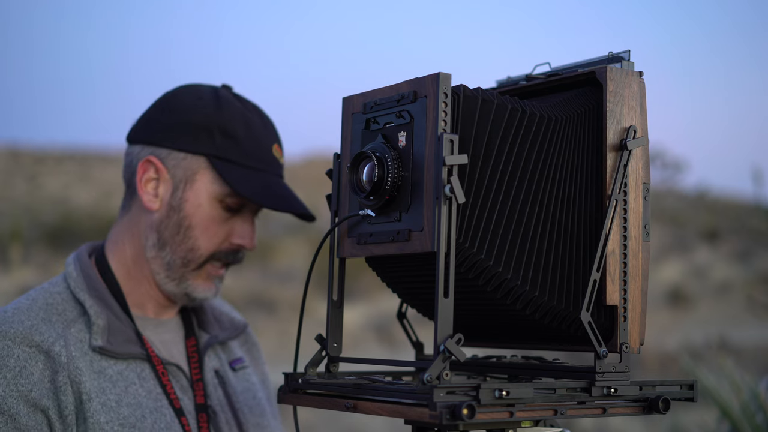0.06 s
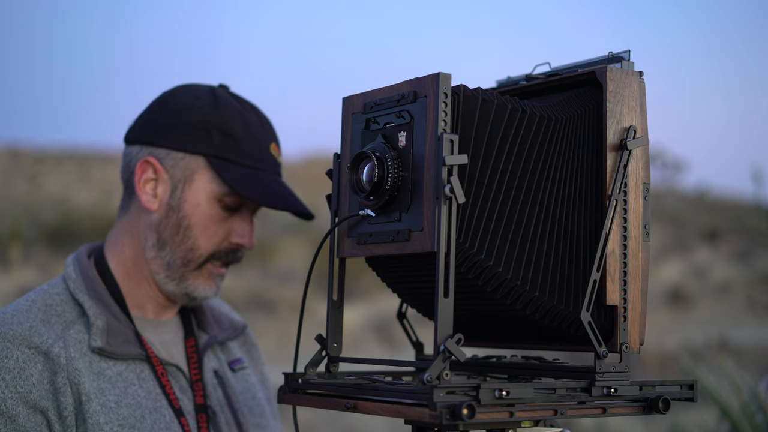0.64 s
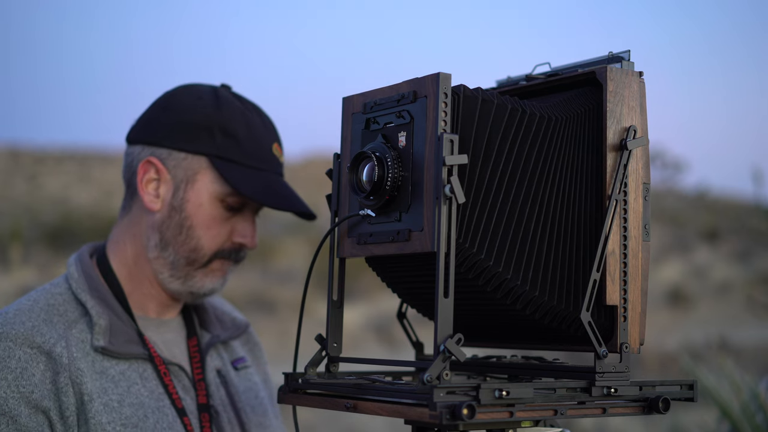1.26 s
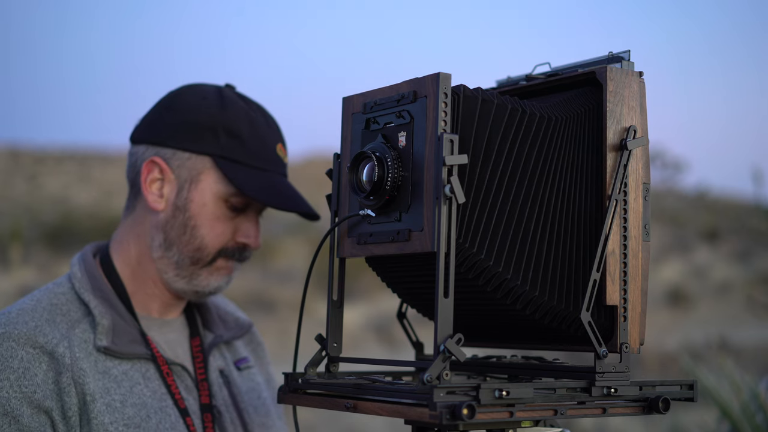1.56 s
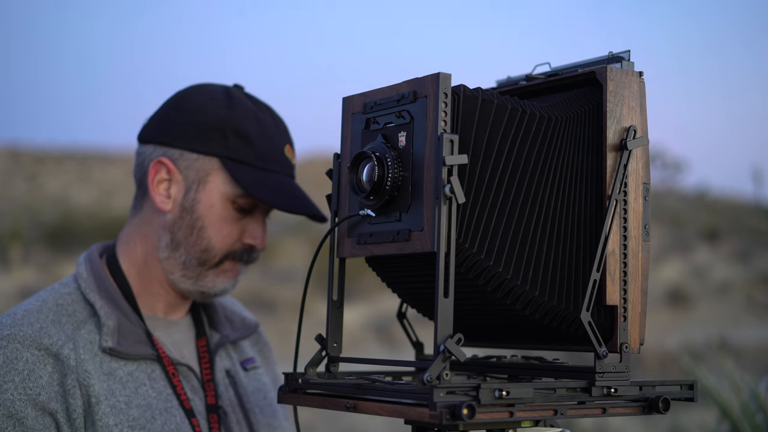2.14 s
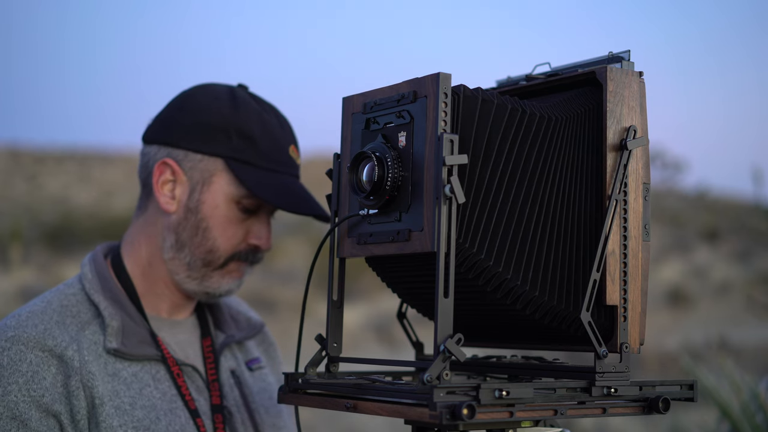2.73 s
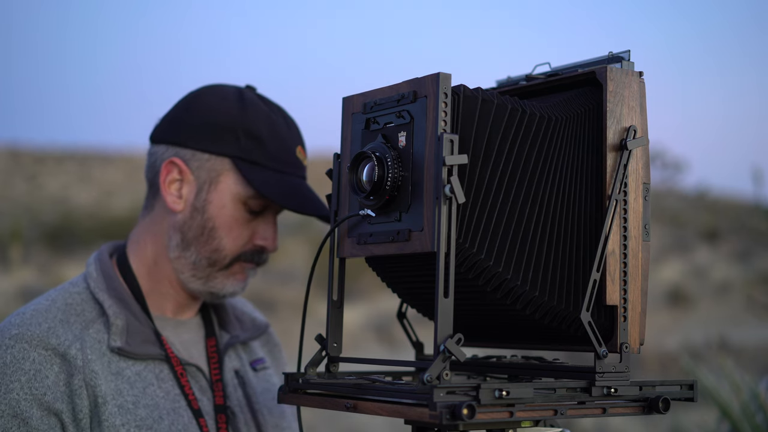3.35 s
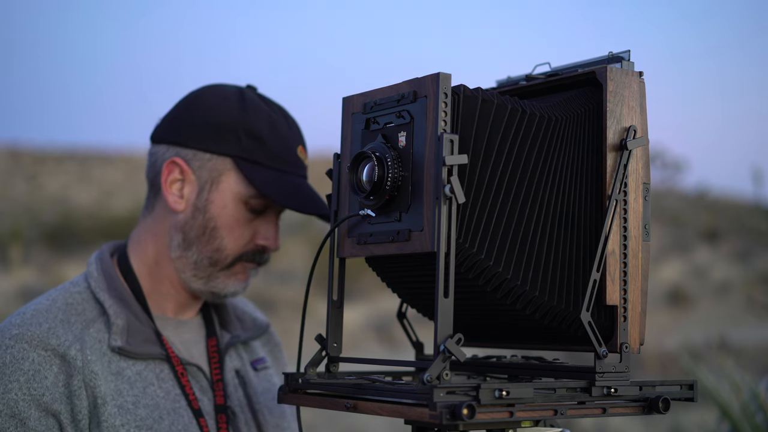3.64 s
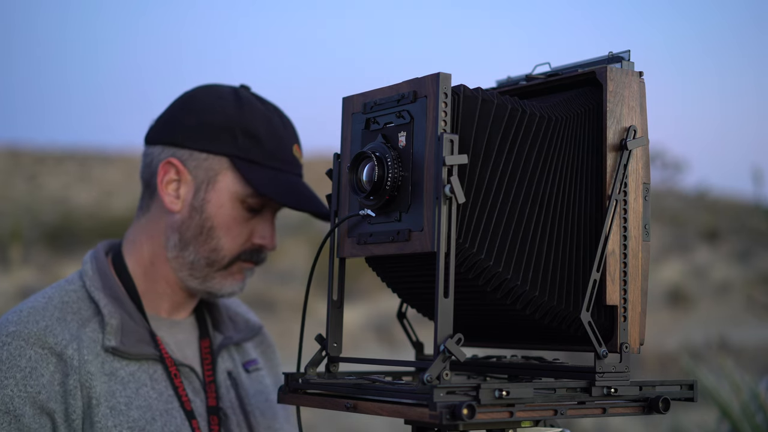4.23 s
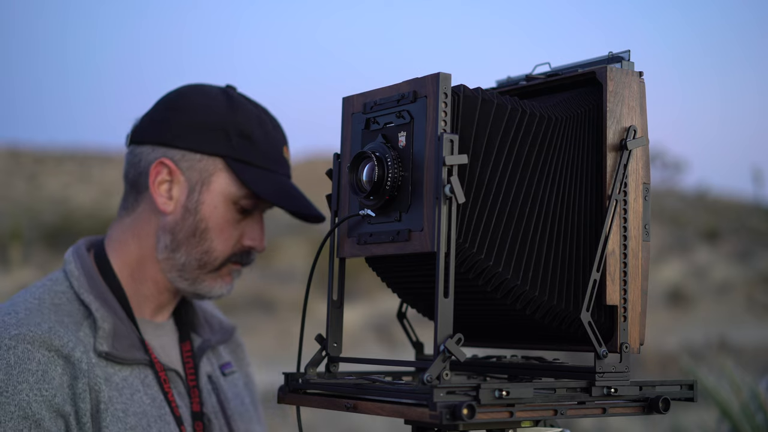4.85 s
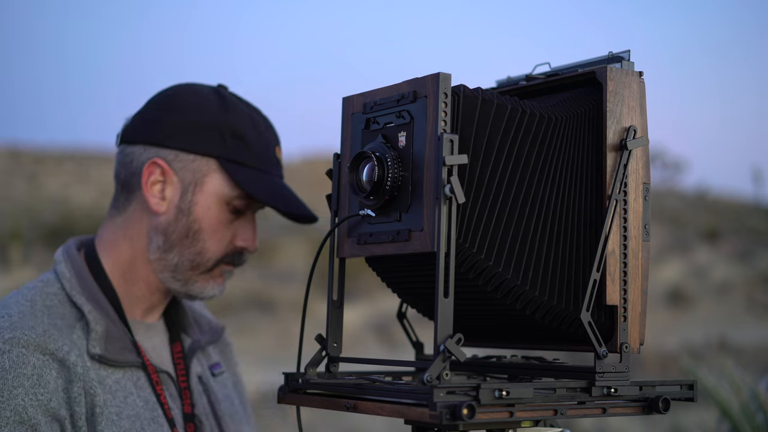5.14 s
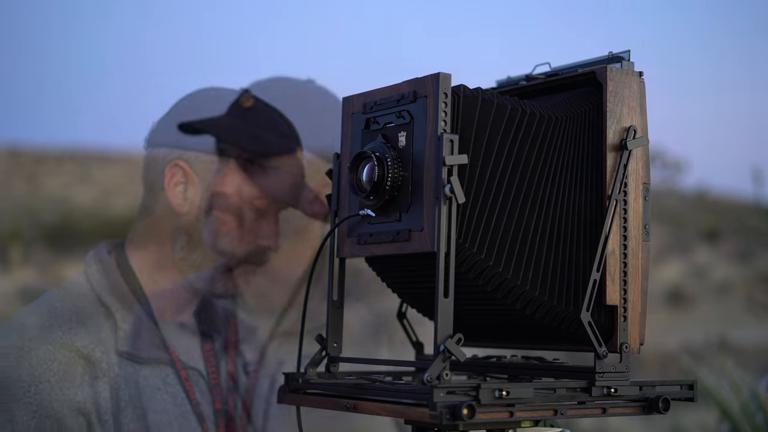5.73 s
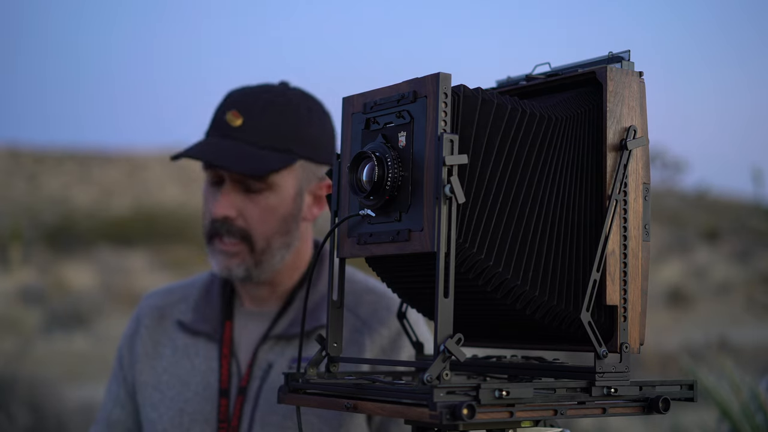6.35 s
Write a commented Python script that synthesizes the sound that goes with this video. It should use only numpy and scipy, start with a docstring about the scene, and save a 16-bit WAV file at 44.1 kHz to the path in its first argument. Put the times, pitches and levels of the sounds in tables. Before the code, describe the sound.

Quiet wind and far road noise, broken by a camera shutter's sharp click and softer closing tick; later, fleece rustles faintly.

```python
"""Leaf shutter in the desert

On a quiet evening the air rumbles softly and tyres murmur on a far road. A cable release trips the
clockwork shutter of a wooden view camera: the blades snap open, ringing the housing and lens board,
and a moment later the gears whirr and tick them shut. The plunger springs back, a far engine pulls
away, and a fleece jacket rustles as the photographer turns."""
import sys
import numpy as np
from scipy import signal
from scipy.fft import rfft, irfft, next_fast_len
from scipy.io import wavfile

SR = 44100
rng = np.random.default_rng(int(sys.argv[2]) if len(sys.argv) > 2 else 0)


def pcm_store(signal):
    """Save signal as 16-bit PCM."""
    levels = np.round(np.clip(np.atleast_2d(signal), -1, 1) * 32767)
    wavfile.write(sys.argv[1], SR, levels.astype(np.int16).T)


N = 281534
TIME = np.arange(N) / SR


def from_db(db):
    """Decibels to gain."""
    return 10 ** (np.asarray(db) / 20)


def rms_one(x):
    """Scale to unit power."""
    return x / np.sqrt(np.mean(x ** 2) + 1e-20)


def at_hz(points, hz):
    """Read a curve on a log-frequency axis."""
    f, value = np.transpose(points)
    return np.interp(np.log(np.maximum(hz, 1)), np.log(f), value)


def pan(left_db):
    """Stereo gains that put the left side left_db above the right."""
    return from_db(np.array([[left_db], [-left_db]]) / 2)


def drift(per_s):
    """A smooth random wander of unit power."""
    knots = rng.standard_normal(1024)
    return rms_one(np.interp(TIME * per_s, np.arange(len(knots)), knots))


def stroke(start, end, db, attack, release):
    """Envelope that rises, holds and dies away; release is a t60."""
    rise = np.clip((TIME - start) / max(attack, 1 / SR), 0, 1)
    return rise * from_db(db) * np.exp(-np.log(1000) * np.clip((TIME - end) / release, 0, 10))


def swell(peak_s, db, half_width):
    """Envelope of something that draws near and recedes."""
    return from_db(db) / (1 + ((TIME - peak_s) / half_width) ** 2)


def together(gains):
    """Unrelated noises add in power."""
    return np.sqrt(sum(gain ** 2 for gain in gains))


def colour(x, spectrum, size=2048):
    """Minimum-phase EQ that keeps the power of white noise."""
    log_gain = np.log(rms_one(from_db(at_hz(spectrum, np.arange(size // 2 + 1) * SR / size))))
    cepstrum = irfft(log_gain)
    cepstrum[1:size // 2] *= 2
    cepstrum[size // 2 + 1:] = 0
    return signal.fftconvolve(x, irfft(np.exp(rfft(cepstrum))))[:N]


def wide_noise(spectrum, likeness):
    """Unit-power stereo noise of a given colour and left-right likeness."""
    size = next_fast_len(N, True)
    hz = np.arange(size // 2 + 1) * SR / size
    mid, side = rfft(rng.standard_normal((2, size))) * from_db(at_hz(spectrum, hz))
    alike = np.clip(at_hz(likeness, hz), 0, 1)
    left_right = np.sqrt(1 + alike) * mid + np.sqrt(1 - alike) * side * [[1], [-1]]
    return rms_one(irfft(left_right, size)[:, :N])


def resonate(x, hz, width_hz):
    """One resonance with unity gain at its peak."""
    r = np.exp(-np.pi * width_hz / SR)
    feedback = [1, -2 * r * np.cos(2 * np.pi * hz / SR), r * r]
    return signal.lfilter(np.array([1, 0, -1]) * (1 - r * r) / 2, feedback, x + 1e-18)


def ring(force, modes):
    """A body's modes answer the force that drives them."""
    return sum(from_db(db) * resonate(force, hz, np.log(1000) / (np.pi * t60)) for hz, db, t60 in modes)


def far_tone(hz, flutter_per_s):
    """A tone whose strength and phase waver on the way through the air."""
    phase = 2 * np.pi * np.cumsum(np.full(N, hz)) / SR
    return rms_one(drift(flutter_per_s) * np.cos(phase) + drift(flutter_per_s) * np.sin(phase))


def knocks(rows, broad, size=8192):
    """Each hit is a short crack, brightest at its own pitch; broad mixes in unfiltered grit."""
    out, t = np.zeros(N + size), np.arange(size) / SR
    for (s, db, hz, t60), grit in zip(rows, rng.standard_normal((len(rows), size))):
        decay = from_db(-60 * t / t60)
        burst = np.sign(grit) * decay
        crack = broad * burst + resonate(burst, hz, hz / 2)
        at = round(s * SR)
        out[at:at + size] += from_db(db) * crack * np.linalg.norm(decay) / np.linalg.norm(crack)
    return out[:N]


def sliding(rows, teeth_per_s, tooth_depth_db):
    """Metal rubs on metal in fine grit that pulses as each tooth or burr slips past."""
    tooth_phase = np.cumsum(teeth_per_s * (1 + 0.54 * drift(100))) / SR % 1
    grit = rms_one(rng.standard_normal(N) * from_db(-tooth_depth_db * tooth_phase))
    return together(stroke(*row) for row in rows) * grit


# Soft gusts. Each row: peak in seconds, level in dB, half-width in seconds.
GUSTS = [(.06, -43, .17), (1.55, -46, .1), (1.91, -41, .13), (2.28, -43.5, .1), (3.1, -50.5, .2),
         (4.78, -48, .2), (6.22, -51.5, .12)]
# The air's low-end weight. Each row: frequency in Hz, gain in dB.
RUMBLE_EQ = [(12, -36.5), (20, -13), (48, -2), (65, -1.5), (107, -1.5), (150, -7.5), (189, -6.5),
             (300, -19.5), (390, -45.5), (660, -120)]
# Stereo image of the distance. Each row: frequency in Hz, left-right likeness from 0 to 1.
FAR_LIKENESS = [(25, .45), (60, 0.9), (125, .85), (250, .92), (500, 0.95), (1200, 1)]


def air_rumble():
    """Nearly calm air rumbles and lifts with each gust."""
    calm = from_db(-50.5)
    wind = together([calm] + [swell(*gust) for gust in GUSTS])
    return wind * from_db(0.65 * drift(14)) * wide_noise(RUMBLE_EQ, FAR_LIKENESS) * pan(-.7)


# The thin top of the noise floor. Each row: frequency in Hz, gain in dB.
HISS_EQ = [(1180, -35.5), (2000, 2), (2110, -0.5), (3390, -0.5), (13400, -3.5), (15100, -7.5),
           (15800, -4.5)]
# Its stereo image. Each row: frequency in Hz, left-right likeness from 0 to 1.
HISS_LIKENESS = [(2000, 0.59), (10000, 0.7), (15000, 0.5)]


def microphone_hiss():
    """A faint, steady bed of microphone noise."""
    return from_db(-64.76) * wide_noise(HISS_EQ, HISS_LIKENESS) * pan(.6)


def far_hum():
    """Something hums low in the distance."""
    return from_db(-55.5) * far_tone(62, flutter_per_s=11) * pan(-2)


# Far pass-bys. Each row: nearest moment in seconds, level in dB, half-width in seconds, tyre pitch in Hz.
PASSES = [(.2, -55.5, 0.49, 756.3), (2.2, -56, 0.29, 770.4), (3.75, -54, 0.69, 734.3),
          (5.33, -54, .16, 462.3)]
# The tyres' broad tones. Each row: ratio to the tyre pitch, level against the pass in dB.
TYRE_TONES = [(.6, -7.5), (.8, -1), (1, 2), (1.22, -8)]


def tyres():
    """Tyres sing in a fluttering cluster of tones as each vehicle passes."""
    song = sum(swell(s, db + tone_db, width) * far_tone(ratio * hz, flutter_per_s=90)
               for s, db, width, hz in PASSES for ratio, tone_db in TYRE_TONES)
    return song * pan(-2)


# The dull colour of far traffic. Each row: frequency in Hz, gain in dB.
ROAD_EQ = [(120, -5.5), (220, -1), (370, -2.5), (450, 1), (550, -2.5), (650, 1), (800, -2), (950, -5.5),
           (1300, -11), (1600, -19), (2100, -27.5), (4000, -42)]


def road_wash():
    """The far road's steady wash swells with each pass and with the engine pulling away."""
    steady = from_db(-49.5)
    with_engine = from_db(-51.5) * engine_effort()
    passes = [swell(s, db + 1.5, width) for s, db, width, _ in PASSES]
    return together([steady, with_engine] + passes) * wide_noise(ROAD_EQ, FAR_LIKENESS) * pan(-2)


# The lever slides, the blades sweep open, then shiver to rest.
# Each row: start and end in seconds, level in dB, attack and release t60 in seconds.
SLIDES = [(2.788, 2.820, -32.5, 0.025, 0.014), (2.8335, 2.849, -20.5, 0.0017, .018),
          (2.851, 2.854, -33.5, .002, .105)]
# Metal hits, from the lever's first tick to the blades closing.
# Each row: start in seconds, level in dB, brightest frequency in Hz, t60 in seconds.
CONTACTS = [(2.812, -32, 8000, 0.0071), (2.8207, -19, 6860, 0.0033), (2.8325, -6, 11500, 0.0079),
            (2.8383, -5.5, 8356, .007), (2.8588, -15.5, 9300, 0.0051), (2.879, -31.5, 4400, 0.014),
            (2.9685, -44, 9500, .006), (2.9754, -37, 7580, .011), (2.9875, -32, 13000, .006),
            (2.9953, -28.5, 7500, .004), (3.0255, -42, 1500, 0.02)]
# The shutter's bright snap. Each row: frequency in Hz, gain in dB.
SHUTTER_EQ = [(200, -46), (380, -8.5), (800, -9.5), (1300, -1.5), (1850, -12), (2400, -3), (3100, -9.5),
              (4300, 1), (5700, -0.5), (7000, -9.5), (8600, 3), (11000, -3.5), (13500, -1.5),
              (15500, -12.5)]


def blades():
    """Lever and blades slide and crack; a duller knock of the casing trails each contact."""
    lag_s, casing_db, casing_hz, casing_t60_s = .0014, -15.5, 2420, .012
    casing = [(s + lag_s, db + casing_db, casing_hz, casing_t60_s) for s, db, _, _ in CONTACTS]
    cracks = knocks(CONTACTS + casing, broad=.35)
    scrape = sliding(SLIDES, teeth_per_s=340, tooth_depth_db=5.5)
    return colour(cracks + scrape, SHUTTER_EQ)


# The wooden lens board rings low, the shutter housing above it.
# Each row: frequency in Hz, relative level in dB, t60 in seconds.
HOUSING_MODES = [(376, -34.5, 0.07), (467, -34.5, 0.31), (1236, -30.5, .045), (1600, -32.5, 0.09),
                 (2350, -29.5, 0.02), (3570, -29.5, .07), (4520, -25.5, .07), (4400, -27, .05),
                 (5300, -29.5, 0.026), (5650, -32, 0.06), (6145, -34.5, .07), (7584, -30, 0.057),
                 (8500, -32.5, .04), (8160, -28.5, 0.033), (8625, -32, .05), (8805, -33.5, .07),
                 (10200, -27, .06), (9458, -26.5, .05), (10020, -33, .05), (9800, -31.5, 0.057),
                 (11400, -35.5, 0.049), (11895, -30.5, .06), (11930, -32.5, .05), (13660, -40.5, .05)]


def housing():
    """Every contact jolts the housing and its board, and each mode rings on briefly."""
    jolts, t = np.zeros(N), np.arange(8192) / SR
    for s, db, _, _ in CONTACTS:
        jolts[round(s * SR)] += from_db(db)
    # alternating polarity keeps the modes from piling into one spike
    ringing = sum((-1) ** k * from_db(db - 60 * t / t60) * np.sin(2 * np.pi * hz * t)
                  for k, (hz, db, t60) in enumerate(HOUSING_MODES))
    return from_db(-3) * signal.fftconvolve(jolts, ringing)[:N]


# Dull plunger taps. Each row: start in seconds, level in dB, brightest frequency in Hz, t60 in seconds.
TAPS = [(2.9412, -54, 3200, 0.019), (3.5098, -46.5, 4030, 0.046)]
# Their mid-heavy colour. Each row: frequency in Hz, gain in dB.
PLUNGER_EQ = [(500, -22), (1300, 4), (2000, -0.5), (2800, -4), (4200, -9), (5500, -12), (8300, -6),
              (10000, -20), (15000, -28)]
# The plunger's short ring. Each row: frequency in Hz, gain in dB, t60 in seconds.
PLUNGER_MODES = [(1406, 5, .03), (1590, 7, 0.031), (2030, 16, 0.047), (3160, 6, 0.019), (4250, 0, 0.024)]


def plunger():
    """The cable release bottoms out, then springs back."""
    taps = colour(knocks(TAPS, broad=0.7), PLUNGER_EQ)
    return taps + ring(taps, PLUNGER_MODES)


# One quick whirr. Each row: start and end in seconds, relative level in dB,
# attack and release t60 in seconds.
GEAR_RUN = [(2.970, 3.0255, -41, 0.0041, 0.0075)]
# The gears' wiry colour. Each row: frequency in Hz, gain in dB.
GEAR_EQ = [(400, -12), (1200, 8.5), (2200, 3.5), (4100, 10.5), (5000, 2), (6200, 8.5), (7400, -2),
           (10000, 6), (12800, 6), (15500, 1)]
# The gear plate's ring. Each row: frequency in Hz, gain in dB, t60 in seconds.
PLATE_MODES = [(1163, 13.5, 0.075), (1940, 7, 0.12), (4300, 1, 0.042), (5630, 0, 0.033), (6200, -5, .03)]


def gears():
    """The timing gears whirr tooth over tooth and set their plate ringing."""
    whirr = from_db(-2) * colour(sliding(GEAR_RUN, teeth_per_s=750, tooth_depth_db=17), GEAR_EQ)
    return whirr + ring(whirr, PLATE_MODES)


# Slap off the camera bed and the ground, left then right. Each row: delay in seconds, level in dB.
ECHOES = [(.0031, -23.5), (.0047, -28)]


def camera():
    """Shutter and plunger up close, almost dry; the shutter is too small to radiate bass."""
    low_cut = signal.butter(4, 300, "high", fs=SR, output="sos")
    shutter = signal.sosfilt(low_cut, blades() + housing() + gears() + 1e-18)
    direct = shutter + plunger()
    echoes = [from_db(db) * np.interp(TIME - delay, TIME, direct, left=0) for delay, db in ECHOES]
    return direct * pan(.15) + np.array(echoes)


def engine_effort():
    """The far engine takes up load, holds it and eases off, on a scale of 0 to 1."""
    return stroke(start=3.95, end=5.21, db=0, attack=0.45, release=1.7)


# The drone's harmonics. Each row: multiple of the firing rate, relative level in dB.
ENGINE_ORDERS = [(2, 1.5), (3, -7), (5, -1)]


def far_engine():
    """An engine drones as it pulls away: its firing rate climbs and levels off."""
    first_hz, top_hz, start_s, speed_up_s, level_db = 96.75, 106.7, 3.95, 0.48, -52.5
    firing_hz = top_hz - (top_hz - first_hz) * np.exp(-np.maximum(TIME - start_s, 0) / speed_up_s)
    phase = 2 * np.pi * np.cumsum(firing_hz * (1 + 0.014 * drift(35))) / SR
    drone = sum(from_db(level_db + db + 2 * drift(12)) * np.sqrt(2) * np.sin(order * phase)
                for order, db in ENGINE_ORDERS)
    return engine_effort() * drone * pan(-2)


# Cloth folds flick. Each row: start in seconds, level in dB, brightest frequency in Hz, t60 in seconds.
FLICKS = [(5.085, -60, 2990, 0.024), (5.626, -49, 4260, 0.039), (5.776, -49.5, 3500, 0.036),
          (5.896, -54, 4500, 0.031), (5.978, -57, 4360, 0.025), (6.03, -58, 2680, 0.085),
          (6.09, -58, 3800, 0.047), (6.138, -57, 3000, 0.027)]
# Sleeves swish across the body. Each row: start and end in seconds, level in dB.
SWISHES = [(5.357, 5.457, -59.5), (5.615, 5.765, -56.5), (5.815, 5.893, -61), (6.036, 6.098, -60.5)]
# The soft colour of fleece. Each row: frequency in Hz, gain in dB.
FLEECE_EQ = [(800, -2), (1400, 7), (2100, 1), (3000, -3), (4800, -1.5), (7500, -8), (9500, -5.5),
             (11500, -19.5), (15500, -23.5)]
# The rub's stereo image. Each row: frequency in Hz, left-right likeness from 0 to 1.
JACKET_LIKENESS = [(3000, 1), (8000, .6)]


def jacket():
    """Fleece rubs in uneven grains through the turn, swish by swish, and a few folds flick."""
    swishes = [stroke(*row, attack=.045, release=0.23) for row in SWISHES]
    turn = swell(peak_s=5.85, db=-61.5, half_width=.75)
    grain = from_db(1.9 * drift(120))
    rub = together(swishes + [turn]) * grain * wide_noise(FLEECE_EQ, JACKET_LIKENESS)
    flicks = colour(knocks(FLICKS, broad=0.3), FLEECE_EQ)
    return (rub + flicks) * pan(-0.21)


def scene():
    """Camera and jacket up front, the desert behind them."""
    foreground = camera() + jacket()
    distance = far_engine() + tyres() + far_hum()
    bed = air_rumble() + road_wash() + microphone_hiss()
    return foreground + distance + bed


def record(dry):
    """Soft-clip the highest peaks, then cut the top steeply."""
    ceiling, cutoff_hz = .95, 15900
    top_cut = signal.ellip(12, .1, 90, cutoff_hz, fs=SR, output="sos")
    return signal.sosfilt(top_cut, ceiling * np.tanh(dry / ceiling))


dry = scene()
out = record(dry)
pcm_store(out)
```